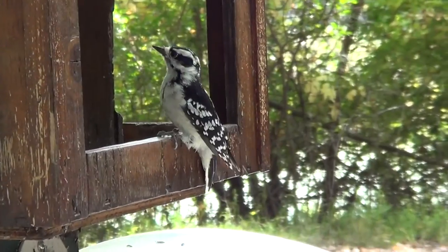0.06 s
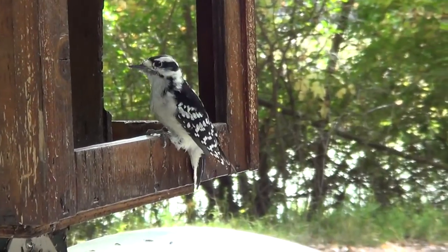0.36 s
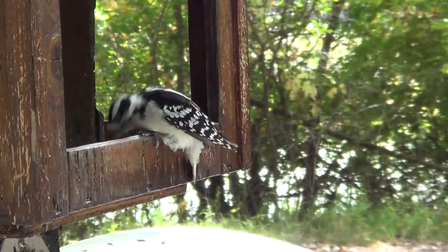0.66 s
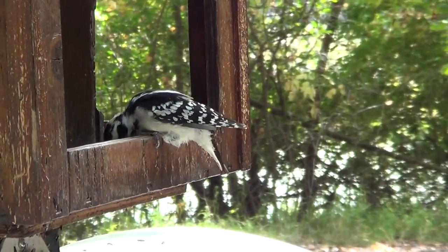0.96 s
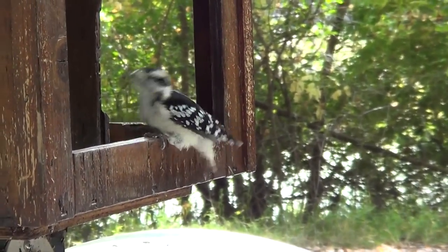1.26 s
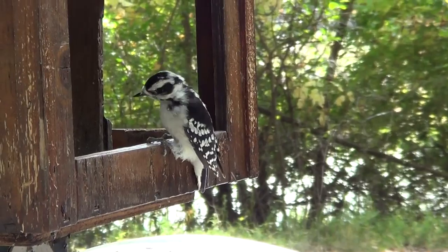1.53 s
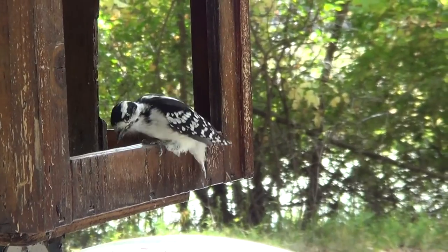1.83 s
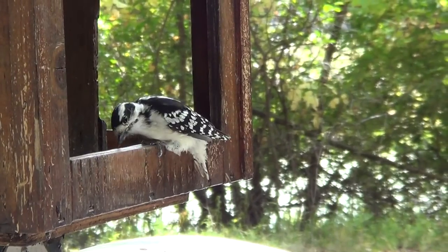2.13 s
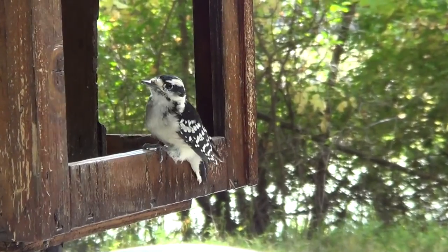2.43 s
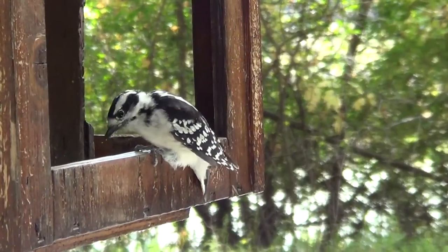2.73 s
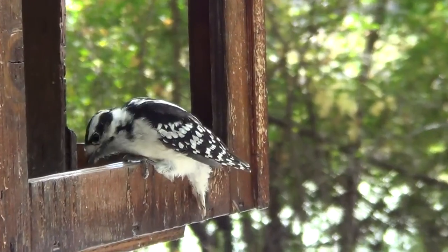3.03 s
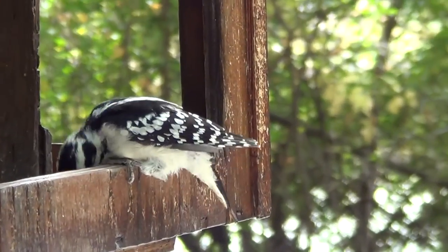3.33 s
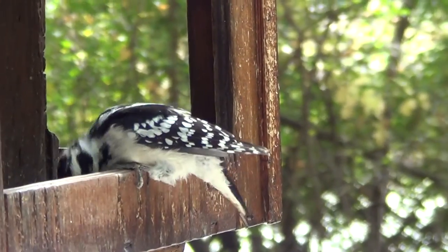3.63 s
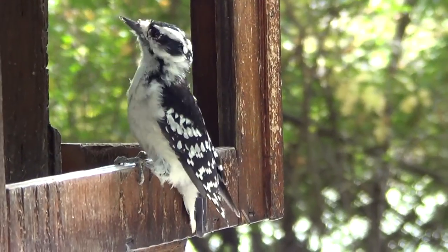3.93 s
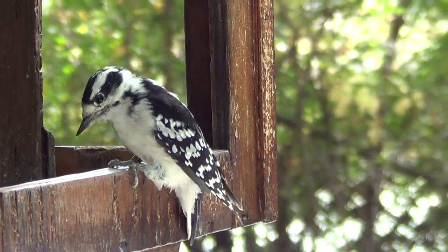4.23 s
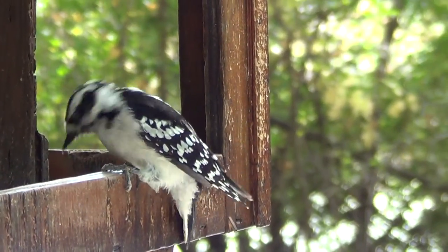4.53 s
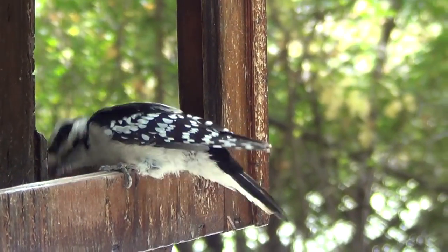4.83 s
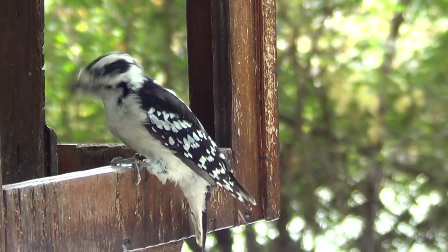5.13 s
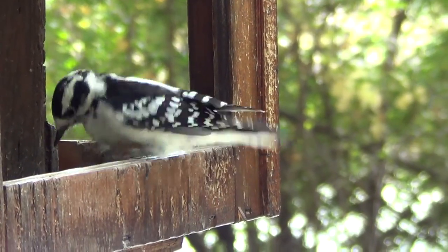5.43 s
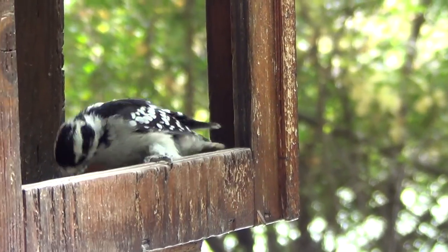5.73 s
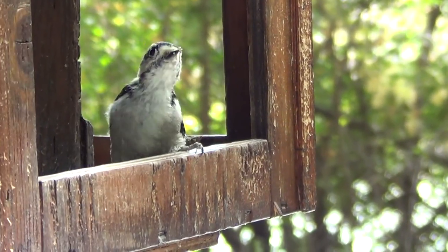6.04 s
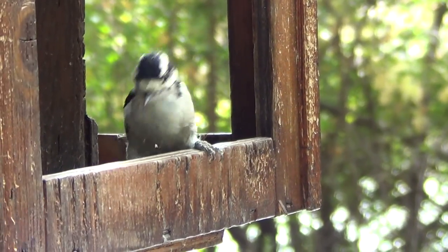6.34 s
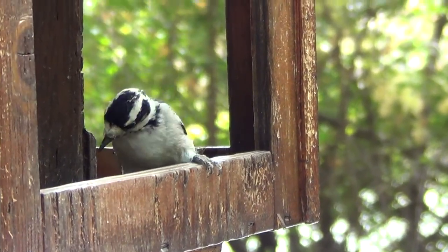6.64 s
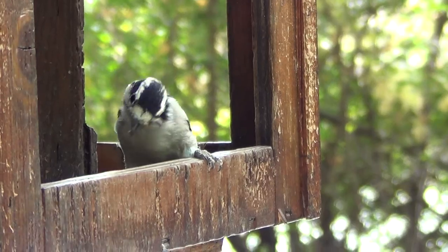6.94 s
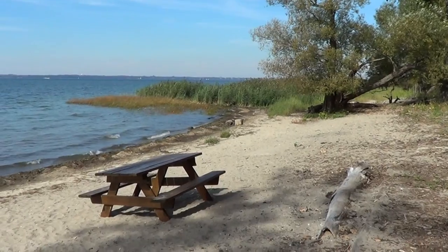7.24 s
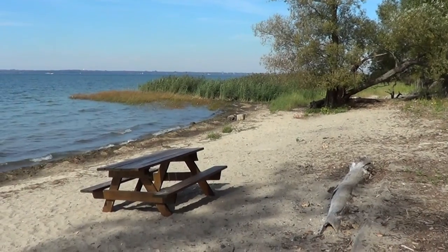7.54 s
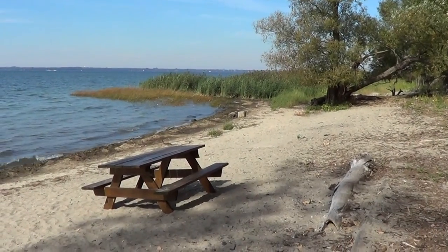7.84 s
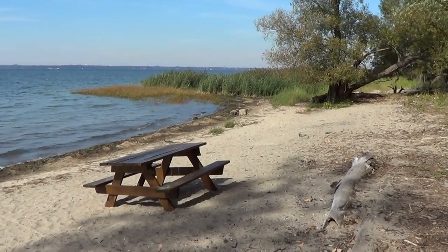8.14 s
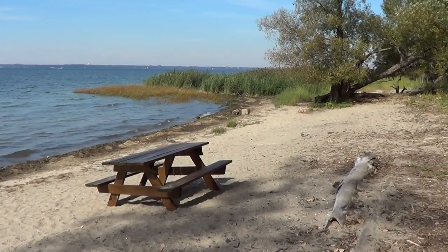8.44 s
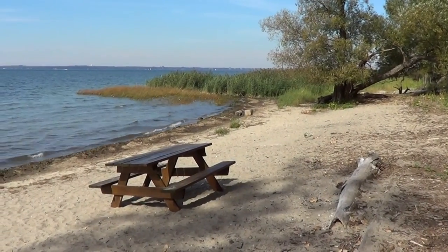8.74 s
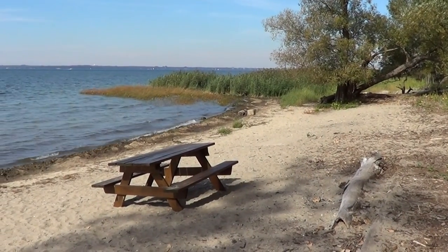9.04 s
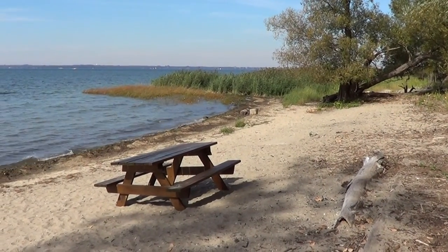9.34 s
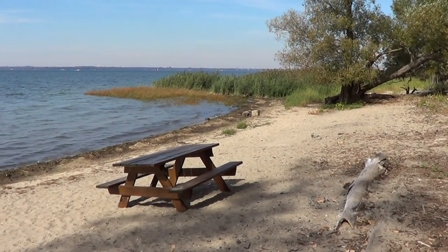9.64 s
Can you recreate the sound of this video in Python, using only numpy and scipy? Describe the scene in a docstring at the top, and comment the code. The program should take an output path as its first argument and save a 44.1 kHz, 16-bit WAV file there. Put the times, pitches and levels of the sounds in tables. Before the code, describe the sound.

Light pecks on wood, high chirps and rustling leaves give way to gusty wind and gentle waves lapping on sand.

```python
"""A woodpecker picks at seed in a wooden feeder near the microphone, cracking husks and ringing the boards.
Songbirds whistle thin and high, one close by, others deeper in the trees; leaves rustle over a far
rumble and one faint hoot. The wood fades out and a lake shore fades in: small waves wash on sand and
shed bubbles, gusts buffet and thump the microphone, and a few blown grains tick against its grille."""
import sys
import numpy as np
from scipy import signal
from scipy.fft import rfft, irfft, next_fast_len
from scipy.io import wavfile
from scipy.ndimage import uniform_filter1d, map_coordinates

SR = 44100
rng = np.random.default_rng(int(sys.argv[2]) if len(sys.argv) > 2 else 0)


def dump_mix(stems):
    """Bounce the given channels to the path in sys.argv[1] as a 16-bit WAV at rate SR."""
    frames = np.atleast_2d(stems).T  # one column per channel
    limited = np.clip(frames, -1, 1)  # hard clip at full scale
    pcm = np.round(limited * 32767).astype(np.int16)
    wavfile.write(sys.argv[1], SR, pcm)


N = 426888

# how alike the two channels are in the wood: (frequency [Hz], likeness [0-1])
WOODS_LIKENESS = [(60, 1), (130, 1), (290, 1), (640, 0.93), (1410, 0.52), (3100, 0.82), (6820, 0.75),
                  (15000, 1)]
# the same on the shore: (frequency [Hz], likeness [0-1])
SHORE_LIKENESS = [(60, 0.88), (130, 0.74), (290, 0.36), (640, 0.89), (1410, 0.79), (3100, 0.87),
                  (6820, 0.78), (15000, 1)]
WOODS_FADE_OUT_S, SHORE_FADE_IN_S = (6.945, 6.992), (7.034, 7.06)
BAND_LIMIT_HZ = 15850


def amp(db):
    """Decibels to gain."""
    return 10 ** (np.asarray(db) / 20)


def unit(x):
    """Scaled to rms 1."""
    return x / np.sqrt(np.mean(x ** 2) + 1e-20)


def bell(x, centre, half):
    """A smooth hump of height 1."""
    return np.exp(-((x - centre) / half) ** 2)


def along(points, hz):
    """(Hz, value) points read on a log axis."""
    freqs, values = np.transpose(points)
    return np.interp(np.log(hz + 1), np.log(freqs + 1), values)


def wobble(rate):
    """A smooth random curve, rate knots a second."""
    return map_coordinates(rng.standard_normal(int(N * rate / SR) + 4), [np.arange(N) * rate / SR])


def filtered(x, response):
    """x shaped by a frequency response."""
    size = next_fast_len(N + SR // 2)
    return irfft(rfft(x, size) * response(np.fft.rfftfreq(size, 1 / SR)), size)[..., :N]


def add(track, s, sound):
    """Mix a sound in at s seconds."""
    room = track[round(s * SR):][:len(sound)]
    room += sound[:len(room)]


def pan(x, left_db):
    """Tip a sound to the left by a level difference."""
    return x * amp([[left_db / 2], [-left_db / 2]])


def rush(spectrum, likeness, patchy_db):
    """Stereo noise of rms 1 with patches of random gain in time and frequency."""
    def mid_side(hz):
        angle = np.arccos(np.clip(along(likeness, hz), 0, 1)) / 2
        return amp(along(spectrum, hz)) * [np.cos(angle), np.sin(angle)]

    cells = signal.stft(rng.standard_normal((2, N)), nperseg=512)[2]
    patches = uniform_filter1d(rng.standard_normal(cells.shape[1:]), size=7, axis=0)
    patches = unit(uniform_filter1d(patches, size=12, axis=1))
    noise = signal.istft(cells * amp(patchy_db * patches), nperseg=512)[1][:, :N]
    mid, side = filtered(noise, mid_side)
    return unit(np.array([mid + side, mid - side]))


def trees(x, t60, early_t60, early_db, width):
    """Trunks nearby scatter a quick answer, the wood behind them a longer one."""
    t = np.arange(SR * 3 // 4) / SR
    decay = (amp(-60 * t / t60) + amp(early_db - 60 * t / early_t60)) * (t > .005)
    tails = (rng.standard_normal(len(t)) + width * rng.standard_normal((2, len(t)))) * decay
    return signal.fftconvolve(x[None], tails / np.linalg.norm(tails[0]), axes=1)[:, :N]


def far_rumble(db=-57.0):
    """A low, steady rumble in the distance."""
    # rumble spectrum: (frequency [Hz], relative density [dB])
    spectrum = [(20, -44), (40, -27), (60, -12), (90, -2), (120, 1.5), (170, -6.5), (260, -10), (420, -35),
                (900, -52)]
    return pan(amp(db + 0.43 * wobble(2.7)) * rush(spectrum, WOODS_LIKENESS, patchy_db=0.6), -0.56)


def leaves(db=-46):
    """Leaves stir steadily around the microphone."""
    # rustle spectrum: (frequency [Hz], relative density [dB])
    spectrum = [(150, -21.5), (250, -5), (303, -2.5), (336, -3), (421, -3.5), (467, -1), (627, -0.5),
                (684, -1.5), (1060, -2.5), (1130, -4), (1210, -3.5), (3880, -7), (6990, -11.5),
                (15800, -27.5)]
    return pan(amp(db + 0.55 * wobble(4.9)) * rush(spectrum, WOODS_LIKENESS, patchy_db=0.76), 0.11)


def wind(breeze_db=-48):
    """Gusts come and go over a light breeze and buffet the microphone."""
    # gusts: (peak time [s], level [dB], half length [s])
    gusts = [(7.25, -41.5, 0.88), (7.97, -38, 0.2), (8.498, -42, 0.13), (8.897, -50, 0.096),
             (9.48, -41.5, 0.12)]
    # buffeting spectrum: (frequency [Hz], relative density [dB])
    spectrum = [(20, -26), (35, -27), (55, -7), (100, -0.5), (170, -1.5), (260, -3.5), (400, -12),
                (800, -32), (2000, -45)]
    t = np.arange(N) / SR
    gust_power = sum(amp(db) ** 2 * bell(t, s, half) for s, db, half in gusts)
    strength = np.sqrt(amp(breeze_db) ** 2 + gust_power) * amp(2.0 * wobble(25))
    return pan(strength * rush(spectrum, SHORE_LIKENESS, patchy_db=0.5), -1.0)


def wind_thumps(right_lag_s=0.0005):
    """Low wind thumps of a cycle or two, slightly later in the right channel."""
    # thumps on the microphone: (time [s], envelope peak [dB], pitch [Hz], half length [s])
    thumps = [(7.057, -18.5, 148, 0.0036), (7.161, -32.5, 228, 0.0082), (7.295, -27.5, 192, 0.0081),
              (7.365, -27.5, 130, 0.0043), (7.498, -26.5, 306, 0.0072), (7.522, -29.5, 214, 0.0083),
              (7.744, -15.5, 184, 0.0044), (7.746, -17, 450, 0.0019), (7.952, -18.5, 256, 0.002),
              (8.078, -28, 130, 0.0054), (8.452, -32.5, 159, 0.0057), (9.487, -29.5, 110, 0.0067),
              (9.55, -34.5, 155, 0.014)]
    left, right = np.zeros((2, N))
    t = np.arange(-SR // 25, SR // 25) / SR
    for s, db, hz, half in thumps:
        thump = -amp(db) * bell(t, 0, half) * np.sin(2 * np.pi * hz * t)
        add(left, s + t[0], thump)
        add(right, s + t[0] + right_lag_s, thump)
    return np.array([left, right])


def grain_ticks(rattle=0.15, rattle_t60=0.0063):
    """A blown grain strikes the grille: a few bright cycles and a tiny rattle."""
    # strikes: (time [s], peak before panning [dB], pitch [Hz], ring [cycles])
    grains = [(7.2191, -10.5, 8300, 1.4), (7.221, -24, 7800, 1.3), (7.8687, -18, 8000, 0.65),
              (7.9393, -8.5, 8200, 0.49), (7.9545, -7.5, 7060, 0.33), (8.2233, -21, 7000, 0.55)]
    out, t = np.zeros(N), np.arange(SR // 100) / SR
    for s, db, hz, cycles in grains:
        life = t * hz / cycles
        ping = life * np.exp(1 - life) * np.sin(2 * np.pi * hz * t)
        contacts = (t == 0) + rattle * rng.standard_normal(len(t)) * amp(-60 * t / rattle_t60)
        tick = np.convolve(contacts, ping)
        add(out, s, amp(db) * tick / np.abs(tick).max())
    return pan(out, -5.5)


def bubble(hz, cycles=9, glide=0.058):
    """A bubble rings for a few cycles, rising in pitch as it surfaces."""
    turns = np.arange(SR // 40) / SR * hz
    life = turns / cycles
    envelope = amp(-20 * life) * (1 - np.exp(-2 * turns))
    return envelope * np.sin(2 * np.pi * turns * (1 + glide * np.tanh(life) / 2))


def bubbles_and_slaps(wash_gain, count=260, median_hz=1900, slap=0.53, slap_t60=0.016):
    """Breaking wavelets shed many small bubbles, louder as the wash swells, and a few slaps."""
    # slaps and larger bubbles at the water's edge: (time [s], level [dB], pitch [Hz])
    plops = [(7.211, -23, 2520), (7.4367, -28, 810), (7.731, -25, 3100), (7.8511, -23, 1120),
             (8.1147, -24, 2800), (8.2252, -24, 1500), (8.2466, -22, 2300), (8.5119, -21, 2840),
             (8.5622, -28, 764), (9.358, -25, 1500), (9.5176, -26.5, 1500)]
    out, t = np.zeros(N), np.arange(SR // 40) / SR
    times = rng.uniform(SHORE_FADE_IN_S[1], N / SR - .03, count)
    for s, (pitch, size) in zip(times, rng.standard_normal((count, 2))):
        hz = min(median_hz * np.exp(.6 * pitch), BAND_LIMIT_HZ)
        add(out, s, wash_gain[int(s * SR)] * amp(4.9 * size - 2.0) * bubble(hz))
    for s, db, hz in plops:
        band = signal.butter(2, [hz / 1.6, hz * 1.43], "band", fs=SR, output="sos")
        splash = unit(signal.sosfilt(band, rng.standard_normal(len(t)))) * amp(-60 * t / slap_t60)
        add(out, s, amp(db) * (bubble(hz, cycles=9.3) + slap * splash))
    return pan(out, 1)


def wave_gains(rise_s=0.1, drain_s=0.084, calm_wash_db=-39, calm_spray_db=-42):
    """Strength of the wash and of the spray: each wave swells to its crest and drains away."""
    # small waves breaking: (crest time [s], wash [dB], spray [dB])
    breakers = [(7.46, -40, -40.5), (7.9, -35.5, -40.5), (8.13, -36, -43), (8.25, -41, -58),
                (8.85, -49, -48), (9.3, -40, -53), (9.6, -48, -51.5)]
    crest_s, wash_db, spray_db = np.transpose(breakers)
    age = np.arange(N) / SR - crest_s[:, None]
    power = np.exp(-np.where(age < 0, (age / rise_s) ** 2, age / drain_s))
    wash_gain = np.sqrt(amp(calm_wash_db) ** 2 + amp(wash_db) ** 2 @ power)
    spray_gain = np.sqrt(amp(calm_spray_db) ** 2 + amp(spray_db) ** 2 @ power)
    return wash_gain, spray_gain


def waves(wash_gain, spray_gain):
    """Small waves wash and hiss on the sand."""
    # water running over sand: (frequency [Hz], relative density [dB])
    wash_spectrum = [(180, -24), (300, -3.5), (416, -6.5), (527, -3.5), (636, -0.5), (838, -1), (1240, -4),
                     (1550, -3.5), (3410, -5.5), (6000, -15), (7800, -33), (13200, -120)]
    # hiss of the spray: (frequency [Hz], relative density [dB])
    spray_spectrum = [(2500, -6), (4500, -0.5), (6000, -1), (7800, 1), (8450, 1.5), (9200, -2),
                      (10500, -6.5), (12500, -15.5), (15800, -20)]
    lapping = wobble(22)
    wash = wash_gain * amp(.4 * lapping) * rush(wash_spectrum, SHORE_LIKENESS, patchy_db=1.06)
    spray = spray_gain * amp(.6 * lapping) * rush(spray_spectrum, SHORE_LIKENESS, patchy_db=1.25)
    return pan(wash, 0.92) + pan(spray, 0.16)


def whistle(hz, gain, taper, buzz):
    """A syrinx tone with tapered ends; a fast tremble of its pitch makes it buzzy."""
    tremble = unit(uniform_filter1d(rng.standard_normal(len(hz)), size=90))
    phase = 2 * np.pi * np.cumsum(hz * (1 + buzz * tremble)) / SR
    return np.sqrt(2) * gain * signal.windows.tukey(len(hz), taper) * np.sin(phase)


def far_hoot(at_s=.72, length_s=0.172, start_hz=495, rise_hz=35.3, db=-52.5):
    """One faint, low, rising hoot from far away."""
    out = np.zeros(N)
    hz = start_hz + rise_hz * np.linspace(0, 1, int(length_s * SR))
    add(out, at_s, whistle(hz, amp(db), taper=.4, buzz=.004))
    return out


def far_birds():
    """Short buzzy slurs from deeper in the wood, heard mostly by their scatter in the trees."""
    # calls: (time [s], length [s], start [Hz], middle [Hz], end [Hz], level [dB], buzz [share of pitch])
    calls = [(1.725, 0.045, 7100, 7640, 7800, -54, .02), (1.86, .05, 6400, 6900, 6970, -51, 0.027),
             (2.663, 0.026, 9550, 8950, 8700, -47, 0.011), (2.888, 0.046, 6800, 7530, 7700, -44.5, 0.019),
             (3.136, 0.05, 6900, 7550, 7700, -48, 0.069), (3.6, 0.1, 6450, 7200, 7250, -49, .013),
             (3.687, 0.076, 5800, 6830, 6770, -47, 0.014), (3.842, 0.064, 6500, 6920, 7160, -44.5, 0.018),
             (3.918, 0.043, 6100, 6670, 6840, -47, 0.018), (4.833, 0.045, 6900, 7330, 7320, -50.5, .014),
             (5.319, 0.22, 8100, 8050, 7970, -53.5, 0.0355), (5.543, .12, 8050, 7800, 7670, -50.5, 0.0276),
             (6.249, 0.15, 2450, 2680, 2890, -50, .05), (6.287, 0.094, 5900, 5430, 5440, -49.5, 0.057)]
    song = np.zeros(N)
    for s, length, start_hz, middle_hz, end_hz, db, buzz in calls:
        slur = np.polyfit([0, .5, 1], [start_hz, middle_hz, end_hz], 2)
        hz = np.polyval(slur, np.linspace(0, 1, int(length * SR)))
        add(song, s, whistle(hz, amp(db), taper=.35, buzz=buzz))
    scatter = trees(song, t60=0.8, early_t60=.15, early_db=-2, width=0.6)
    return pan(amp(-3) * song + amp(-0.9) * scatter, -2.8)


def drooping_note(length, start_hz, held_hz, end_hz, db, accent_db, catch_s):
    """Pitch and gain of a whistle that swells to an accent, catches briefly, holds and then droops."""
    attack_s, settle_s, catch_db, knee_share = 0.0095, 0.0203, 13, .57
    t = np.arange(int(length * SR)) / SR
    droop = np.sin(np.pi / 2 * np.clip((t / length - knee_share) / (1 - knee_share), 0, 1)) ** 2
    hz = held_hz + (start_hz - held_hz) * np.exp(-t / settle_s) + (end_hz - held_hz) * droop
    stress_db = accent_db * bell(t, .62 * catch_s, 0.0079) - catch_db * bell(t, catch_s, .005)
    return hz, amp(db + stress_db) * (1 - np.exp(-t / attack_s))


def whip_note(held_s, start_hz, top_hz, db, plunge_s):
    """Pitch and gain of a note that swells, then plunges; the throat rings as it passes snap_hz."""
    attack_s, bottom_hz, fade_db, snap_hz, snap_db = 0.013, 2580, 6, 7150, 13
    t = np.arange(int((held_s + plunge_s) * SR)) / SR
    plunge = np.sin(np.pi / 2 * np.clip((t - held_s) / plunge_s, 0, 1)) ** 2
    hz = np.interp(t, [0, held_s], [start_hz, top_hz]) + (bottom_hz - top_hz) * plunge
    snap = bell(hz, snap_hz, half=870) * np.minimum(t / held_s, 1)
    return hz, amp(db + snap_db * snap - fade_db * plunge) * (1 - np.exp(-t / attack_s))


def near_bird():
    """A songbird close by: two thin drooping whistles, then two that end in a downward whip."""
    # drooping whistles: (time [s], length [s], start [Hz], held [Hz], end [Hz], level [dB],
    # opening accent [dB], delay until the voice catches [s])
    droops = [(1.285, .123, 8380, 8670, 7330, -37, 2.5, 0.039),
              (5.766, .135, 8590, 8010, 7150, -35, 10.5, 0.044)]
    # whipped whistles: (time [s], hold [s], start [Hz], top [Hz], held level [dB], plunge [s])
    whips = [(6.008, .059, 8000, 8500, -36.5, .016), (6.134, .051, 8550, 8360, -33.5, 0.02)]
    song = np.zeros(N)
    for note, calls in (drooping_note, droops), (whip_note, whips):
        for s, *call in calls:
            hz, gain = note(*call)
            add(song, s, whistle(hz, gain, taper=.05, buzz=0.0074))
    scatter = trees(song, t60=0.55, early_t60=0.086, early_db=6, width=0.68)
    return pan(amp(-2.5) * song + amp(-2.0) * scatter, -3.0)


def woodpecker(crack=0.56, crunch_t60=0.012, attack_s=0.00064, spot_db=10.5, spot_octaves=0.16):
    """The beak cracks a seed in a brief crunch; firm blows also ring the feeder's boards."""
    # beak on seed and wood: (time [s], level [dB], brightness [dB/octave], ring of the boards [dB],
    # frequency that the struck spot favours [Hz])
    pecks = [(0.1277, -39, 1.5, -5, 4200), (0.8397, -35, 0.5, -13, 1100), (3.3640, -23, 0, 0, 2810),
             (3.7126, -42, -5, -15, 800), (4.3233, -44, 1, -12, 2400), (4.38, -44, 1, -18, 4200),
             (5.124, -39, -1, -9, 1500), (5.559, -41.5, 2, -9, 4200), (5.6496, -40.5, -3, -9, 1500),
             (5.821, -40, 6, -12, 11000), (6.372, -43, 0, -12, 9000)]
    # modes of the boards: (frequency [Hz], relative level [dB], t60 [s])
    modes = [(852, -5, 0.023), (1097, -9, 0.033), (1480, -12.5, 0.013), (2270, -2.5, .011),
             (2424, -0.5, 0.015), (3340, -8, .01), (4200, -5.5, 0.011), (5050, -2, 0.0077),
             (5720, -4.5, 0.0089), (7760, 2, 0.0065), (9100, -5.5, 0.0064), (11100, -15, 0.0062)]
    out, t = np.zeros(N), np.arange(SR // 12) / SR
    husk_band = signal.butter(2, (450, 7400), "band", fs=SR, output="sos")
    for s, db, bright_db, ring_db, spot_hz in pecks:
        ring = np.zeros(len(t))
        for hz, mode_db, t60 in modes:
            favour = bell(np.log2(hz), np.log2(spot_hz), spot_octaves)
            struck_db = mode_db + bright_db * np.log2(hz / 2500) + spot_db * favour + rng.normal(0, 1)
            phase = 2 * np.pi * hz * t + rng.uniform(0, 2 * np.pi)
            ring += amp(struck_db - 60 * t / t60) * np.sin(phase)
        crunch = unit(signal.sosfilt(husk_band, rng.standard_normal(len(t)))) * amp(-60 * t / crunch_t60)
        blow = (amp(ring_db) * ring + crack * crunch) * (1 - np.exp(-t / attack_s))
        add(out, s, amp(db) * blow / np.std(blow[:SR // 250]))  # the first 4 ms set the level
    scatter = trees(out, t60=0.22, early_t60=0.054, early_db=18, width=0.53)
    return pan(out + amp(-20) * scatter, 1.1)


def scene():
    """The wood around the feeder fades to silence, then the lake shore fades in."""
    woods = leaves() + far_rumble() + near_bird() + far_birds() + far_hoot() + woodpecker()
    wash_gain, spray_gain = wave_gains()
    shore = waves(wash_gain, spray_gain) + wind() + bubbles_and_slaps(wash_gain)
    shore += wind_thumps() + grain_ticks()
    t = np.arange(N) / SR
    fade_out = np.interp(t, WOODS_FADE_OUT_S, [1, 0]) ** 2
    fade_in = np.interp(t, SHORE_FADE_IN_S, [0, 1]) ** 2
    return fade_out * woods + fade_in * shore


def record(dry):
    """The left channel leads slightly; nothing is kept above the band limit."""
    # phase between the channels: (frequency [Hz], lead of the left [rad])
    lead = [(40, 0), (150, 0.21), (500, 0.69), (2500, 0.57), (6500, 1), (9200, 0)]
    sides = np.array([[1], [-1]])
    return filtered(dry, lambda hz: np.exp(.5j * along(lead, hz) * sides) * (hz < BAND_LIMIT_HZ))


dry = scene()
out = record(dry)
dump_mix(out)
```